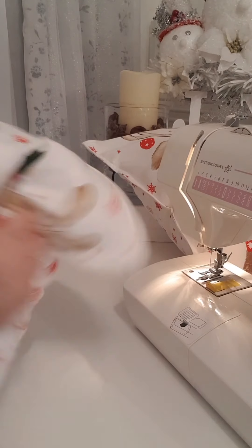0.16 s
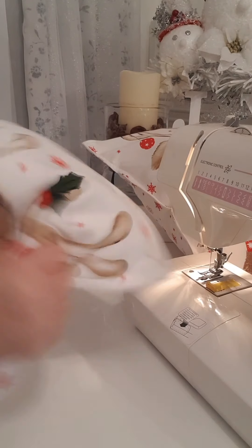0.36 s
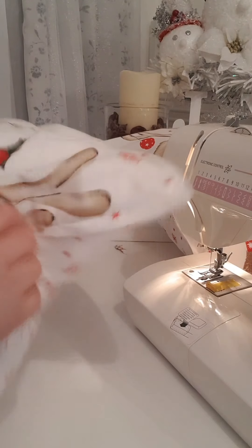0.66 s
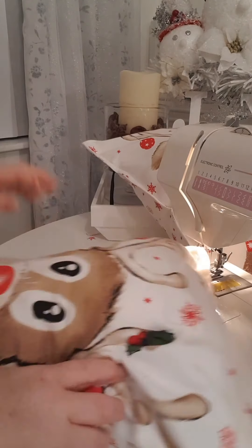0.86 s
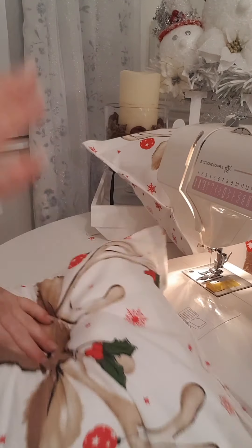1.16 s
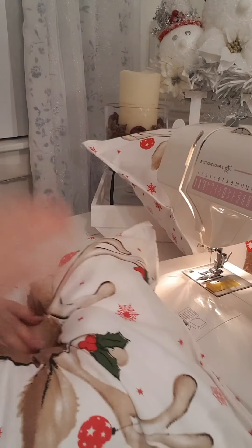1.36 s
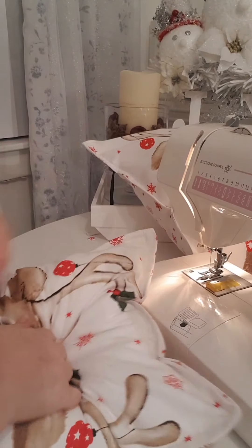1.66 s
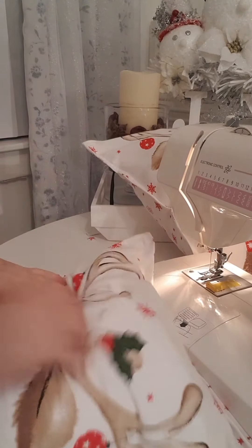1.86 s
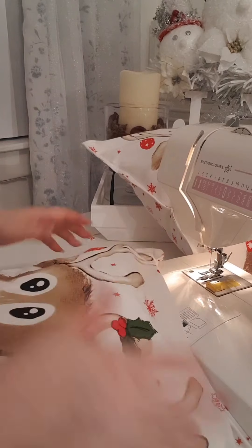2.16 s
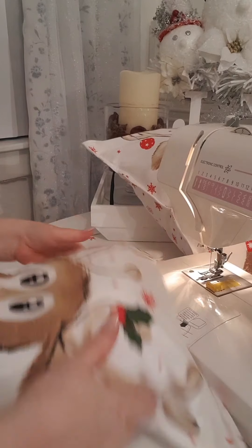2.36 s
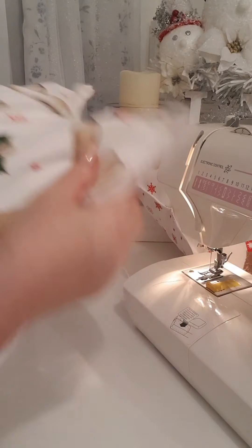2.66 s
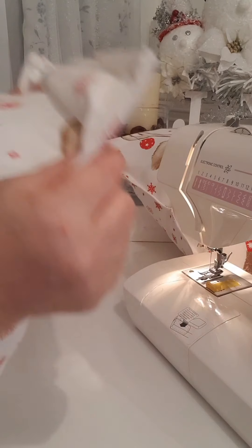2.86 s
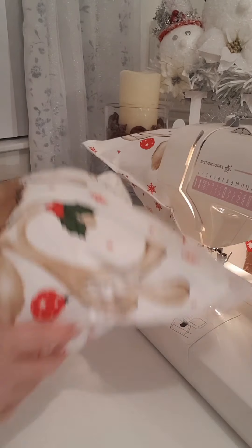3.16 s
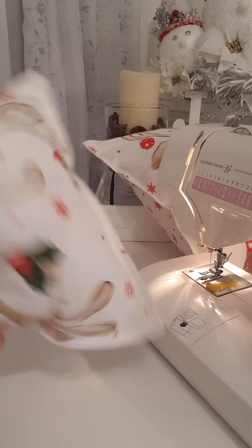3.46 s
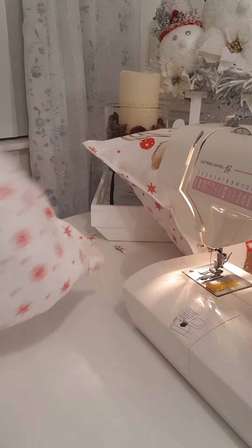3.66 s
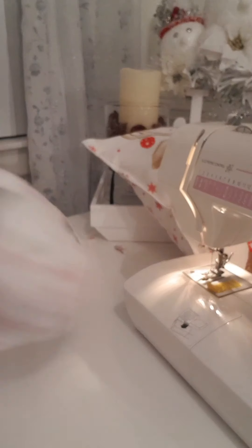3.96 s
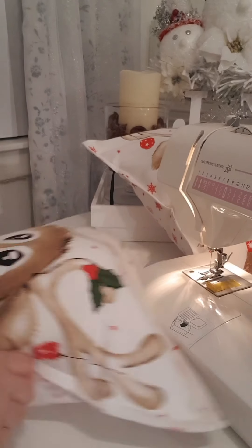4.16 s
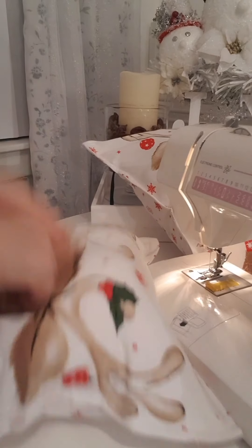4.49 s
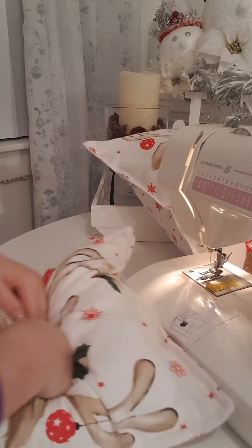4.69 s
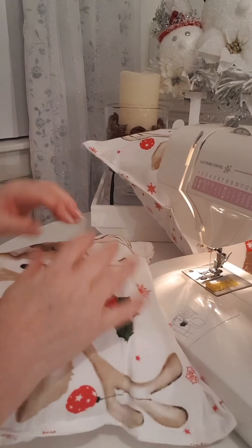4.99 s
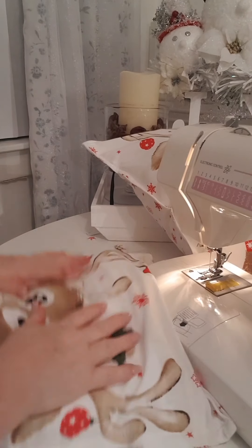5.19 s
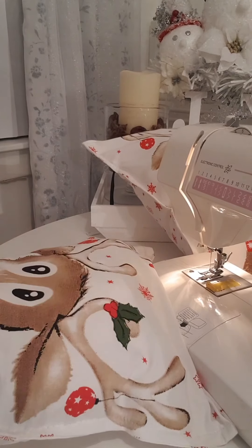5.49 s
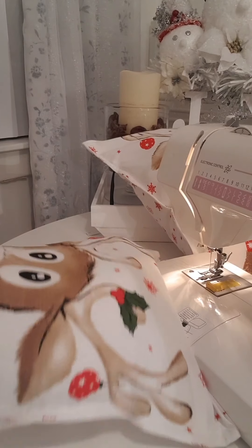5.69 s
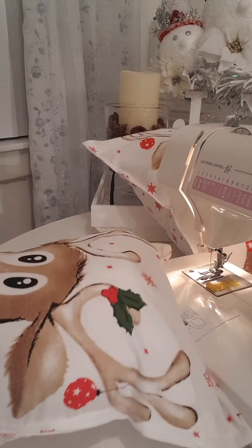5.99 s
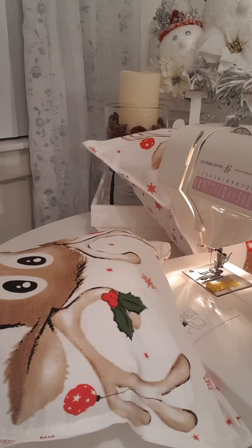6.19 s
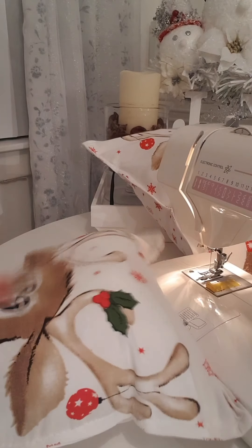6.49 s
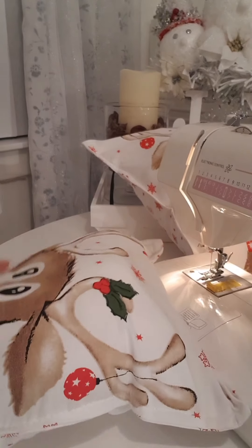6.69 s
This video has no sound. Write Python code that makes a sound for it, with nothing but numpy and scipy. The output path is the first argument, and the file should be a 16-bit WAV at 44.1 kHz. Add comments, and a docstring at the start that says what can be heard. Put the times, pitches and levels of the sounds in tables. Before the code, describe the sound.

Dry cloth rubbing and low puffs of air open the scene as a cushion is turned in the hands. Padded slaps hit the table around one second, then rustling swishes and scattered soft pats continue. A calmer moment leads to two heavy cushioned thumps, with crisp cloth scrunches and tiny ticks last. Close stereo microphone, brighter on the left, short indoor reverberation.

```python
"""Soft puffs of air are heard first, over the rustle of hands on the cover of a stuffed cotton cushion.
The cushion is shaken, turned, dropped on a table and patted into shape in a small furnished room.
Puffs are pressure pulses; blows are damped thuds, fixed modes and filtered grains; rubbing is dense random clicks.
Small ticks are enveloped noise with pings, and once a hard object on the sewing table is nudged and clinks.
Near sound favours the left microphone; decaying noise and low modes form the room, over a quiet room tone."""
import sys
import numpy as np
from scipy import signal
from scipy.fft import rfft, irfft
from scipy.io import wavfile

SR = 44100
rng = np.random.default_rng(int(sys.argv[2]) if len(sys.argv) > 2 else 0)


def transcribe(signal):
    """Save signal, clipped to [-1, 1], as a 16-bit WAV file at the path in sys.argv[1]."""
    frames = np.atleast_2d(signal).T
    limited = np.clip(frames, -1, 1)
    pcm = np.round(limited * 32767).astype(np.int16)
    wavfile.write(sys.argv[1], SR, pcm)


N = 301644
TIME = np.arange(N) / SR   # s
FREQS = np.maximum(np.fft.rfftfreq(N, 1 / SR), 1)   # Hz

# Levels in the tables are relative: common gains and the microphones' balance follow.
# Spectrum of the room's background: hz [Hz], level_db [dB]
ROOM_TONE_COLOUR = [(20, -7), (50, 5.5), (80, -2), (110, 4), (170, -8), (300, -22.5), (1000, -25),
                    (2500, -25.5), (5000, -25.5), (9000, -27), (12000, -24), (16000, -23.5)]
# Spectrum returned by the walls: hz [Hz], level_db [dB]
WALL_COLOUR = [(40, -9), (90, -4.5), (250, -1.5), (500, -6), (1100, -10.5), (2200, -10), (3500, -20.5),
               (8000, -34), (11000, -17), (16000, -20)]
# Reverberation time of the walls: hz [Hz], t60_s [s]
WALL_T60 = [(100, 0.3), (400, 0.2), (1500, 0.41), (10000, 0.56)]
# Low standing waves of the room: hz [Hz], level_db [dB], t60_s [s]
STANDING_WAVE_MODES = [(113.4, -4.5, 0.27), (148.3, 0, 0.23), (184.2, -2.5, 0.35), (260.8, -9.5, 0.47),
                       (282.4, -5.5, 0.3), (330.6, -0.5, 0.15), (385.2, -1, 0.16), (461, -5, 0.091),
                       (623, -10, 0.065)]
# Near sound, left microphone over right: hz [Hz], left_minus_right_db [dB]
NEAR_BALANCE = [(60, -1), (150, 3), (380, 6.5), (800, 7), (1400, 8), (2400, 15), (4400, 20), (8000, 21),
                (11000, 15), (15000, 17)]
# Correlation of diffuse sound at the two microphones: hz [Hz], likeness [-1 to 1]
DIFFUSE_LIKENESS = [(30, .4), (100, .7), (300, .55), (600, .2), (1200, -.1), (2500, 0), (16000, 0)]
# Touches of the nudged hard object: start_s [s], level_db [dB]
CLINK_TOUCHES = [(0.779, -49.5), (0.786, -46)]
# Modes of the hard object: pitch_hz [Hz], level_db [dB], t60_s [s]
HARD_OBJECT_MODES = [(1044, -2, 0.28), (1056, 1, 0.059), (1394, 1, 0.11), (3100, -21, 0.19),
                     (4000, -17, .04), (5200, -12, 0.11), (6164, -6, 0.041), (7120, -7, 0.064),
                     (11300, -10.5, 0.07)]
# Sharp ticks of nails and seams: start_s [s], level_db [dB], pitch_hz [Hz]
NAIL_TICKS = [(0.6776, -45, 4230), (0.7764, -48.5, 5130), (2.4055, -51.5, 5100), (2.5875, -63, 4320),
              (6.683, -64, 10400), (6.696, -55.5, 6770), (6.709, -58, 5470), (6.732, -50.5, 4600),
              (6.766, -55, 6840), (6.777, -51.5, 7500)]
# Spectrum of a tick's scratch: hz [Hz], level_db [dB]
SCRATCH_COLOUR = [(800, -11), (1600, 10.5), (2500, -55), (4300, -2), (7000, 4), (9000, -7), (11500, 4),
                  (16000, -17)]
# A hand strokes, grips or turns the cushion: peak_s [s], swell_s [s], fade_s [s],
# hiss_db [dB] of the cloth, folds_db [dB] of buckling, rasp_db [dB] under the palm
HAND_STROKES = [(0.09, 0.16, 0.087, -50.5, -52.5, -48), (0.208, 0.073, 0.2, -51, -54.5, -48.5),
                (0.356, 0.13, 0.34, -52.5, -58, -51), (0.536, 0.13, .50, -54.5, -56.5, -63.5),
                (0.677, 0.084, 0.11, -48.5, -55, -52.5), (0.778, 0.026, 0.098, -53, -54.5, -68),
                (0.923, 0.016, 0.17, -55.5, -47, -51), (1.332, 0.18, 0.19, -48.5, -49, -59),
                (1.601, 0.12, 0.26, -60.5, -62.5, -71), (1.75, 0.08, 0.17, -58.5, -53.5, -56),
                (1.818, 0.055, .08, -49, -44, -58), (1.961, 0.41, .15, -57.5, -57, -59),
                (2.23, 0.1, 0.58, -86, -60, -64), (2.36, 0.17, 0.62, -58, -69, -69),
                (2.537, 0.2, 0.11, -58, -68, -59.5), (2.638, .04, 0.077, -50, -48, -54),
                (2.947, 0.14, 0.26, -47.5, -60, -56.5), (3.1, 0.42, 0.47, -68, -56, -55.5),
                (3.294, .22, 0.17, -60, -58, -56.5), (3.473, 0.21, 0.24, -58.5, -56, -59),
                (3.64, 0.47, 0.82, -63.5, -60.5, -65), (3.99, 0.11, .20, -75, -59.5, -60),
                (4.081, 0.37, .06, -56, -74, -76), (4.321, 0.018, 0.49, -61, -58.5, -61),
                (4.459, 0.077, .22, -67.5, -50.5, -54.5), (4.74, 0.27, 0.1, -58.5, -66, -73),
                (4.944, 0.073, 0.074, -47.5, -48.5, -51), (5.074, 0.17, 0.16, -56, -61.5, -65),
                (5.451, 0.1, 0.41, -60.5, -65, -63.5), (5.645, 0.084, 0.24, -52, -52, -55),
                (6.14, 0.045, 0.15, -46.5, -41, -41.5), (6.337, 0.019, .14, -45.5, -48, -51),
                (6.505, 0.36, 0.21, -53.5, -60.5, -72), (6.793, 0.069, 0.09, -50, -57, -54)]
# Spectrum of sliding threads: hz [Hz], level_db [dB]
SLIDE_COLOUR = [(400, -3), (850, -0.5), (1500, -1.5), (2200, -4.5), (3100, -3.5), (4000, -3.5),
                (7000, -7.5), (8700, -14), (11200, -10), (16000, -13.5)]
# Spectrum of the rasp under the palm: hz [Hz], level_db [dB]
RASP_COLOUR = [(300, 17), (550, 7), (1000, 8.5), (1800, 0), (3000, -38), (6000, -66)]
# Spectrum of buckling folds: hz [Hz], level_db [dB]
FOLD_COLOUR = [(25, -18), (60, 0), (130, 2), (300, -1), (500, 6), (800, -7), (1500, -27.5), (4000, -51)]
# Puffs of air as the cover snaps taut or the cushion lands: peak_s [s], level_db [dB], puff_hz [Hz]
AIR_PUFFS = [(0.048, -31, 141), (0.058, -18.5, 330), (0.103, -33, 136), (0.192, -32.5, 190),
             (0.206, -34, 214), (0.242, -34.5, 149), (0.326, -18, 410), (0.334, -31, 493),
             (0.433, -35.5, 258), (0.639, -33, 447), (0.923, -23, 114), (0.948, -31.5, 133),
             (1.276, -24.5, 77.6), (1.299, -30, 460), (1.614, -38.5, 307), (1.739, -37.5, 400),
             (2.215, -37, 168), (2.641, -23, 202), (3.074, -36.5, 270), (3.477, -35.5, 206),
             (3.74, -41, 194), (3.762, -37.5, 249), (4.407, -42, 120), (4.456, -30.5, 438),
             (4.508, -38.5, 420), (4.882, -32, 420), (4.907, -29, 200), (5.657, -37.5, 167),
             (6.105, -20, 260), (6.137, -24.5, 526), (6.341, -17, 293)]
# Palms and the cushion land: start_s [s], thud_db [dB], thud_hz [Hz],
# slap_db [dB] on the cover, crush_db [dB] of the weave, boom_db [dB] of the table
BLOWS = [(0.206, -40, 217, -39, -41, -45), (0.636, -34, 272, -42, -49, -61),
         (0.679, -33.5, 274, -38.5, -55, -77), (0.922, -25.5, 298, -36, -48, -49),
         (1.265, -18.5, 447, -35.5, -36, -38), (1.298, -25, 367, -35.5, -48, -33),
         (1.328, -35, 745, -35, -27.5, -36.5), (1.611, -36.5, 260, -58, -57, -54),
         (1.717, -41.5, 278, -54.5, -55, -46.5), (1.819, -30.5, 360, -39.5, -45, -58),
         (2.179, -58, 283, -72, -82, -51), (2.624, -40, 282, -44, -65, -38),
         (4.314, -45, 240, -48, -65, -52), (4.334, -29, 475, -51.5, -63, -51),
         (4.454, -29.5, 370, -49, -72, -48), (4.507, -36.5, 363, -60, -70, -49),
         (4.881, -35, 430, -41, -43, -39.5), (5.831, -43, 410, -60, -61, -75),
         (6.102, -13.5, 295, -33, -35.5, -30), (6.135, -39, 505, -29, -35, -29.5),
         (6.144, -20.5, 350, -49, -42, -37), (6.332, -32.5, 308, -38, -31, -33.5)]
# Modes of the table top under the cushion: hz [Hz], level_db [dB], t60_s [s]
TABLE_TOP_MODES = [(53, -5, 0.11), (81, -6.5, 0.117), (111, -1, 0.095), (148.3, -1, 0.11),
                   (183.3, -7.5, 0.16), (385.3, -9, 0.15), (755, -14, 0.14), (830, -16, 0.14),
                   (1028, -21.5, .17), (1385, -24.5, 0.14), (2144, -25.5, 0.36)]
# Spectrum of a slap on the cover: hz [Hz], level_db [dB]
SLAP_COLOUR = [(250, -3), (550, 13), (900, 5), (1400, 0.5), (2300, -7.5), (4000, -16.5), (9000, -65)]
# Spectrum of the crushed weave: hz [Hz], level_db [dB]
CRUSH_COLOUR = [(800, -10), (2000, 6), (4200, 5.5), (7000, -2.5), (8800, -9), (12000, -14), (16000, -4)]

ROOM_TONE_DB = -70   # RMS level
CUTOFF_HZ = 15900
CONTACT_S = 0.0016   # time constant over which the filling cushions every blow
SLAP_CRACK, CRACK_T60_S = 0.65, 0.018   # extra share at first touch, and its decay time
STROKE_SWING_DB = 20   # gained over a stroke's swell time and lost over its fade time
LIFT_OFF_DB = 7.5   # folds and rasp need pressure: further loss one swell or fade time from the peak


def from_db(db):
    """Level to amplitude: twenty decibels are a factor of ten."""
    return 10 ** (np.asarray(db) / 20)


def rms_one(x):
    """Normalisation: divide by the root of the mean square, giving unit power."""
    return x / np.sqrt(np.mean(x ** 2) + 1e-20)


def at_hz(points, hz):
    """Interpolation on a logarithmic frequency axis."""
    table = np.array(points)
    return np.interp(np.log(hz), np.log(table[:, 0]), table[:, 1])


def coloured(x, spectrum):
    """Linear filtering: multiply the spectrum by a smooth gain curve."""
    return irfft(rfft(x) * from_db(at_hz(spectrum, FREQS)), N)


def drift(rate):
    """Low-passed noise: a smooth random wander with unit spread."""
    spectrum = rfft(rng.standard_normal(N)) / (1 + (2 * FREQS / rate) ** 4)
    return rms_one(irfft(spectrum, N))


def grains(per_s, spread_db, alike):
    """Shot noise: random clicks of uneven size and sign, a share of them common to both microphones."""
    sizes_db = spread_db * np.minimum(rng.exponential(1, (3, N)), 4)
    sizes = from_db(sizes_db) * rng.choice([-1, 1], (3, N))
    clicks = sizes * (rng.random((3, N)) < per_s / SR)
    share = np.clip(alike, 0, 1)
    return np.sqrt(share) * clicks[0] + np.sqrt(1 - share) * clicks[1:]


def add(track, s, sound):
    """Superposition: add a short sound at a given time."""
    start = max(round(s * SR), 0)
    track[start:start + len(sound)] += sound[:max(N - start, 0)]


def dying(t, t60):
    """Exponential decay: the amplitude falls by 60 dB in t60 seconds."""
    return np.exp(-np.log(1000) * t / t60)


def ring(modes, t):
    """Modal vibration: a sum of damped sines whose strengths vary with each call."""
    out = 0
    for hz, db, t60 in modes:
        gain = from_db(db + rng.normal(0, 2.7))
        out = out + gain * np.sin(2 * np.pi * hz * t) * dying(t, t60)
    return out


def diffuse_noise():
    """Diffuse field: the likeness of the two channels depends on frequency."""
    mid, side = rfft(rng.standard_normal((2, N)))
    alike = np.clip(at_hz(DIFFUSE_LIKENESS, FREQS), -1, 1)
    return irfft(np.sqrt(1 + alike) * mid + np.sqrt(1 - alike) * side * [[1], [-1]], N)


def room_tone():
    """Stationary background: a diffuse field of coloured noise."""
    return from_db(ROOM_TONE_DB) * rms_one(coloured(diffuse_noise(), ROOM_TONE_COLOUR))


def room(x, wet_db, first_echo_s):
    """Reverberation: dense reflections set in after the nearest surfaces and decay band by band."""
    t = TIME[:SR // 2]
    noise = rfft(diffuse_noise())
    onset = np.clip(t / first_echo_s - 1, 0, 1)
    response = 0
    edges_hz = [0, 200, 700, 2500, 7000, SR / 2]
    for low, high in zip(edges_hz, edges_hz[1:]):
        band = irfft(noise * ((FREQS > low) & (FREQS <= high)), N)[:, :len(t)]
        decay = dying(t, at_hz(WALL_T60, (low + high) / 2)) * onset
        response = response + band * decay / np.sqrt(np.sum(decay ** 2))
    source = coloured(x, WALL_COLOUR)[None]
    return from_db(wet_db) * signal.fftconvolve(source, response, axes=1)[:, :N]


def standing_waves(x, level_db, build_s, phase_apart):
    """Room resonance: low modes build up after each push, in different phase at the two microphones."""
    t, response = TIME[:SR // 2], 0
    for k, (hz, db, t60) in enumerate(STANDING_WAVE_MODES):
        swell = dying(t, t60) * (1 - np.exp(-t / build_s))
        phase = phase_apart * (-1) ** k * np.array([[1], [-1]])   # radians
        wave = np.cos(2 * np.pi * hz * t + phase)
        response = response + from_db(db + level_db) * 2 * swell / swell.sum() * wave
    return signal.fftconvolve(x[None], response, axes=1)[:, :N]


def microphones(x):
    """Acoustic shadow: the left port faces the hands, while the right one is shaded in the treble."""
    ratio = from_db(at_hz(NEAR_BALANCE, FREQS))
    gains = 2 * np.array([ratio, np.ones_like(ratio)]) / (1 + ratio)
    return irfft(rfft(x) * gains, N)


def clinks():
    """Struck resonance: the nudged object touches twice and its modes ring briefly."""
    out = np.zeros(N)
    for s, db in CLINK_TOUCHES:
        add(out, s, from_db(db) * ring(HARD_OBJECT_MODES, TIME[:SR // 2]))
    return out


def ticks(t60, scratch_db, ping_db):
    """Brief excitation: a bright scratch, a ping of its own pitch and a faint hollow knock."""
    envelope, pings, t = np.zeros(N), np.zeros(N), TIME[:SR // 10]
    for s, db, hz in NAIL_TICKS:
        add(envelope, s, from_db(db + scratch_db) * dying(t, t60))
        level = db + ping_db
        add(pings, s, ring([(hz, level, .008), (1700, level - 15, .06), (700, level - 17.5, .08)], t))
    return pings + envelope * rms_one(coloured(rng.standard_normal(N), SCRATCH_COLOUR))


def stroke_levels():
    """Power addition: strokes swell and die exponentially, giving gains of hiss, folds and rasp."""
    hiss, folds, rasp = np.zeros((3, N))
    for s, swell_s, fade_s, hiss_db, folds_db, rasp_db in HAND_STROKES:
        # 0 at the fastest motion, 1 a swell or fade time from it
        away = np.maximum((s - TIME) / swell_s, (TIME - s) / fade_s)
        active = away < 3
        sliding_db = -STROKE_SWING_DB * away[active]
        pressing_db = sliding_db - LIFT_OFF_DB * away[active] ** 2
        hiss[active] += from_db(hiss_db + sliding_db) ** 2
        folds[active] += from_db(folds_db + pressing_db) ** 2
        rasp[active] += from_db(rasp_db + pressing_db) ** 2
    return np.sqrt([hiss, folds, rasp])


def shifting(x, depth_db, rate, count):
    """Spectral modulation: as the cloth bends, each band swells and sinks a little on its own."""
    spectrum, out = rfft(x), 0
    place = np.interp(np.log(FREQS), np.log([700, 12000]), [0, count - 1])
    for k in range(count):
        band = irfft(spectrum * np.maximum(1 - abs(place - k), 0), N)   # overlapping triangles
        out = out + band * from_db(depth_db * drift(rate))
    return out


def scattered(x, nearest_s, farthest_s, strength, count):
    """Interference: weak early copies from the table, the machine and the arms roughen the colour."""
    out = x.copy()
    for delay in rng.uniform(nearest_s, farthest_s, count):
        copy = np.array([np.interp(TIME - delay, TIME, channel) for channel in x])
        out += strength * rng.choice([-1, 1]) * copy
    return out / np.sqrt(1 + count * strength ** 2)


def rubbing():
    """Stick-slip friction: threads catch by the thousand, while folds buckle in far fewer, dull pops."""
    slide_gain, folds_gain, rasp_gain = stroke_levels()
    grip = drift(rate=56)   # the hand sticks and slips unevenly

    threads = coloured(grains(per_s=9000, spread_db=2.0, alike=0.2), SLIDE_COLOUR)
    threads = rms_one(shifting(threads, depth_db=1.84, rate=16.3, count=8))
    slide = threads * slide_gain * from_db(0.67 * grip)

    palm = rms_one(coloured(grains(per_s=1300, spread_db=0.0, alike=1.0), RASP_COLOUR))
    rasp = palm * rasp_gain * from_db(2.6 * drift(rate=124))

    pops = rms_one(coloured(grains(per_s=450, spread_db=1.5, alike=0.81), FOLD_COLOUR))
    folds = pops * folds_gain * from_db(3.15 * grip)
    return scattered(slide + rasp, nearest_s=0.000536, farthest_s=.004, strength=0.074, count=8) + folds


def puffs(lag_s, level_db, roundness):
    """Impulsive radiation: a taut snap or a landing sends out a dip, a pointed pressure peak and a dip."""
    out, t = np.zeros(N), TIME[:SR // 20] - 1 / 40   # pulse centred in its window
    for s, db, hz in AIR_PUFFS:
        puff = np.real((1 - 2j * np.pi * hz * (t - lag_s) / roundness) ** -(roundness + 1))
        add(out, s + t[0], from_db(db + level_db) * puff)
    return out


def pats(thud_cycles, slap_t60, crush_t60, thud_db, boom_db, slap_db, crush_db, knock_db):
    """Damped impact: a blow thuds, booms and knocks, slaps the cover and hisses in the crushed weave."""
    (body, slap_envelope, crush_envelope), t = np.zeros((3, N)), TIME[:SR // 2]
    # short hollow knock of the table or the machine on it
    knock = ring([(834, -0.03, 0.014), (1370, -1.9, 0.011)], t)
    soft = 1 - np.exp(-t / CONTACT_S)
    slap_decay = dying(t, slap_t60) + SLAP_CRACK * dying(t, CRACK_T60_S)
    for s, db, hz, cover_db, weave_db, table_db in BLOWS:
        thud = from_db(db + thud_db) * np.sin(2 * np.pi * hz * t) * dying(t, thud_cycles / hz)
        boom = from_db(table_db + boom_db) * ring(TABLE_TOP_MODES, t)
        add(body, s, soft * (boom - thud + from_db(cover_db + knock_db) * knock))
        add(slap_envelope, s, from_db(cover_db + slap_db) * soft * slap_decay)
        add(crush_envelope, s, from_db(weave_db + crush_db) * soft * dying(t, crush_t60))
    slap = slap_envelope * rms_one(coloured(grains(per_s=4000, spread_db=4.0, alike=0.54), SLAP_COLOUR))
    crush = crush_envelope * rms_one(coloured(grains(per_s=6500, spread_db=2.5, alike=0.42), CRUSH_COLOUR))
    return body + slap + crush


def scene():
    """Superposition of near cloth sounds, the room's answer and its quiet background."""
    near = clinks() + ticks(t60=0.021, scratch_db=1.5, ping_db=7.0) + rubbing()
    near = near + puffs(lag_s=0.0011, level_db=0.0, roundness=2.93)
    near = near + pats(thud_cycles=11.3, slap_t60=0.15, crush_t60=0.033, thud_db=1.5, boom_db=-3.0,
                       slap_db=-1.0, crush_db=-3.5, knock_db=6.0)
    walls = room(near[0], wet_db=-4.5, first_echo_s=0.0038)
    waves = standing_waves(near[0], level_db=0.2, build_s=0.0016, phase_apart=0.13)
    return microphones(near) + walls + waves + room_tone()


def record(dry):
    """Low-pass filtering: the top of the spectrum is cut steeply."""
    return irfft(rfft(dry) / np.sqrt(1 + (FREQS / CUTOFF_HZ) ** 240), N)


dry = scene()
out = record(dry)
transcribe(out)
```